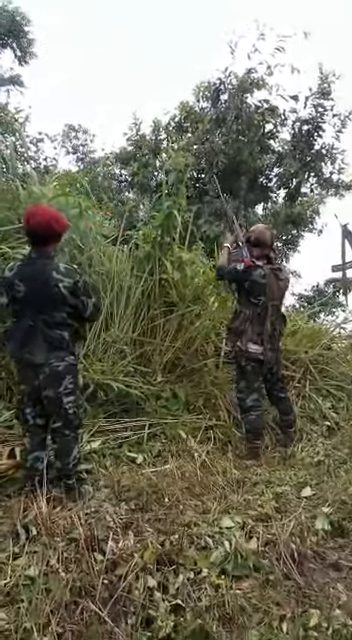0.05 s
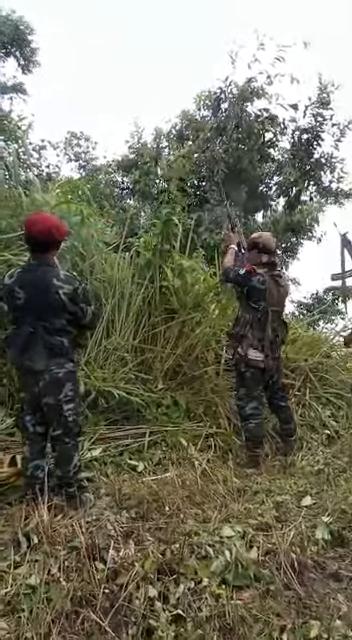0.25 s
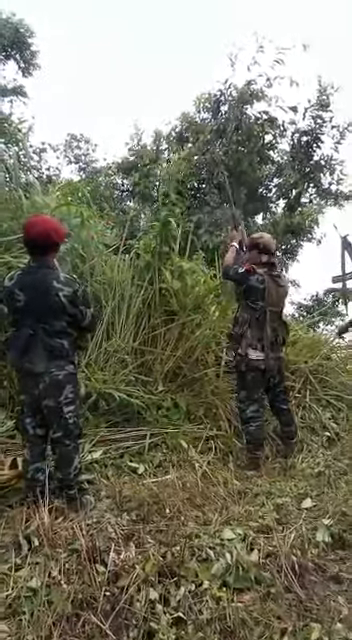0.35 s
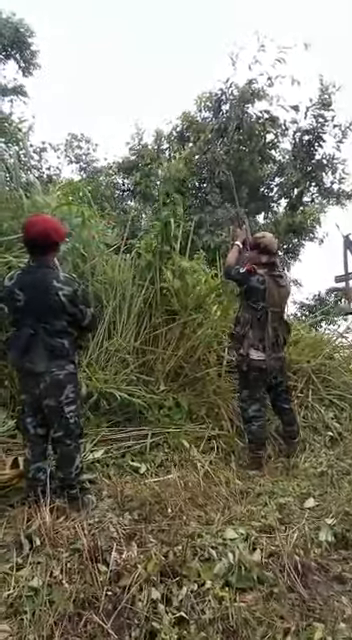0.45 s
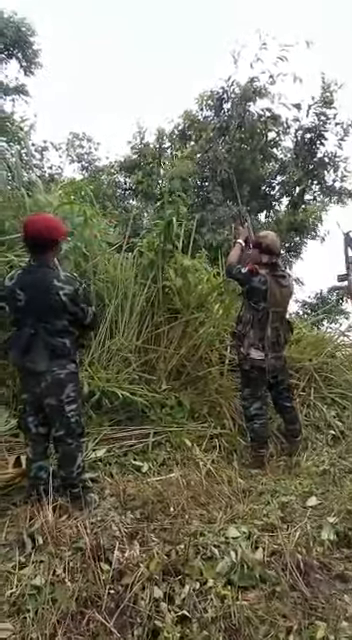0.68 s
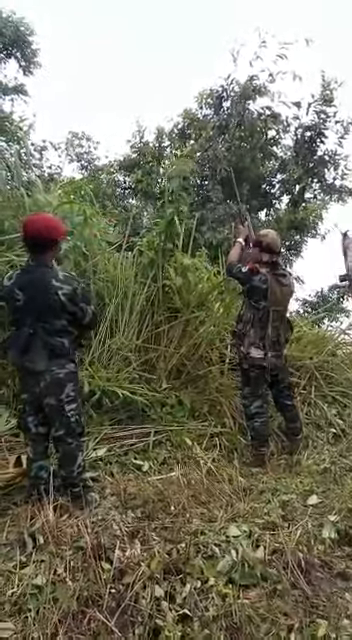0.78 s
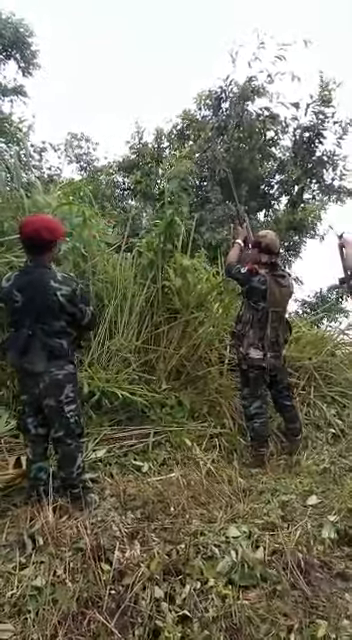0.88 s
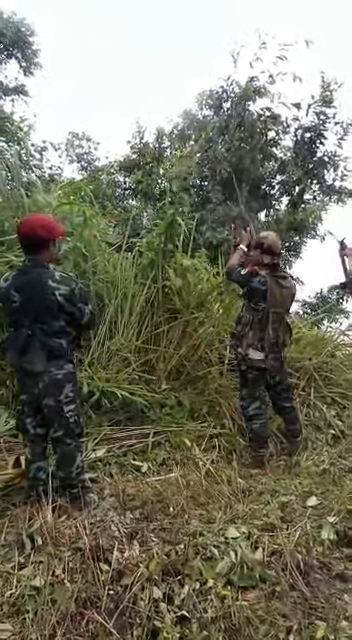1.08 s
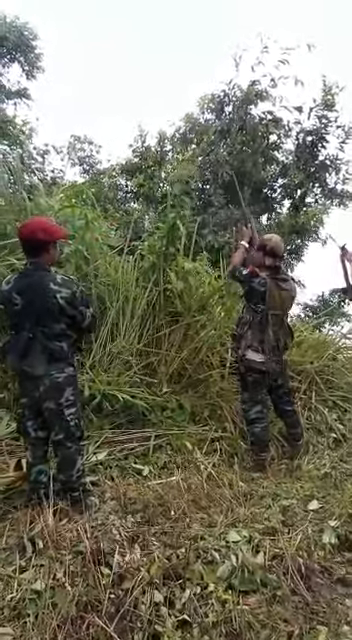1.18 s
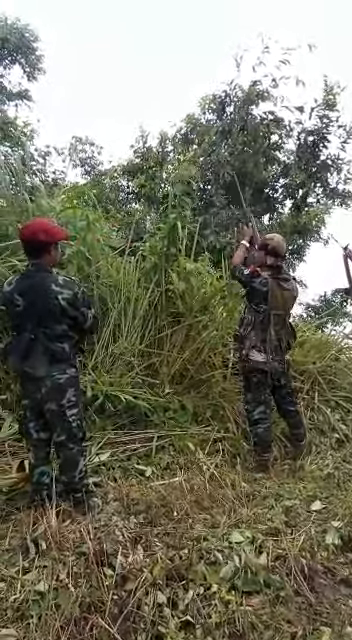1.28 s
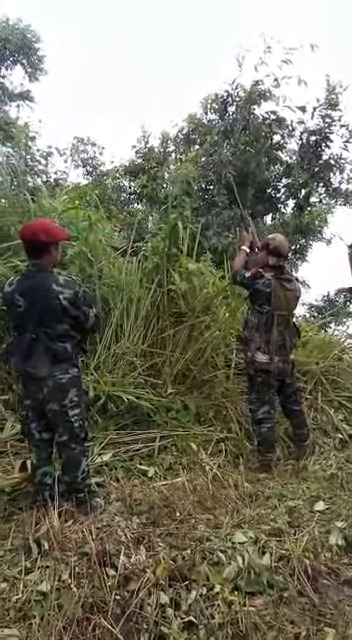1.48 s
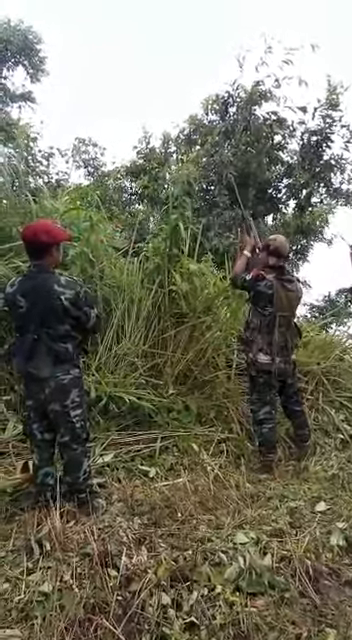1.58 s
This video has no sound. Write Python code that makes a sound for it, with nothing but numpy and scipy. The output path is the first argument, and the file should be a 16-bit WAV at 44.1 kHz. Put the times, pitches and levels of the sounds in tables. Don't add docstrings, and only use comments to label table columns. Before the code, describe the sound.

Two rifle shots less than a second apart in a brushy clearing, each preceded by tiny metallic ticks and followed by echoes from bushes, trees and a far slope; close phone microphone overloads and clips.

```python
import sys
import numpy as np
from scipy import signal
from scipy.io import wavfile
from scipy.ndimage import uniform_filter1d

SR = 44100
rng = np.random.default_rng(int(sys.argv[2]) if len(sys.argv) > 2 else 0)


def master_out(mix):
    frames = np.transpose(np.atleast_2d(mix))
    ceiling = np.clip(frames, -1, 1)
    pcm = np.round(ceiling * 32767).astype(np.int16)
    wavfile.write(sys.argv[1], SR, pcm)


def decibels_to_gain(level_db):
    exponent = np.asarray(level_db, float) / 20
    return 10 ** exponent


N = 72765


def evened(x):
    return x / np.sqrt(np.mean(x ** 2) + 1e-20)


def read(points, hz):
    f, value = np.transpose(points)
    return np.interp(np.log(hz + 1), np.log(f + 1), value)


def add(mix, s, sound):
    part = mix[round(s * SR):][:len(sound)]
    part += sound[:len(part)]


def shaped(x, field_db):
    hz, t, z = signal.stft(x, SR, nperseg=512, noverlap=384)
    z = z * decibels_to_gain(field_db(hz[:, None], t[None]))
    return signal.istft(z, SR, nperseg=512, noverlap=384)[1][:len(x)]


def coloured(x, points):
    return evened(shaped(x, lambda hz, t: read(points, hz)))


def filtered(x, order, hz, kind):
    return signal.sosfilt(signal.butter(order, hz, kind, fs=SR, output="sos"), x)


def fading(t, t60_s):
    return decibels_to_gain(-60 * t / t60_s)


def ring(t, modes):
    return sum(decibels_to_gain(db) * fading(t, t60) * np.sin(2 * np.pi * hz * t) for hz, db, t60 in modes)


# pitch_hz, level_db (per Hz)
STILL = [(30, 4), (150, -2), (400, 0.5), (1500, -4.5), (3000, -6), (7000, -14), (12500, -9), (15000, -15)]
STILL_DB = -69
PUFF_HZ, PUFF_WIDTH_HZ, PUFF_DB, PUFF_END_S, PUFF_FADE_S = 134, 25, -61, .088, .008
PUFF_SKIRT_DB, PUFF_SKIRT_HZ = -11, 420
PUFF_SWELL_DB, PUFF_TOP_S, PUFF_SWELL_S = 9, .067, 0.016


def still_air():
    t = np.arange(N) / SR
    floor = coloured(rng.standard_normal(N), STILL)
    wander = rng.standard_normal((N, 2)) @ [1, 1j]
    drift = signal.lfilter(*signal.butter(2, PUFF_WIDTH_HZ / 2, fs=SR), wander)
    moan = np.sin(2 * np.pi * PUFF_HZ * t + np.angle(drift))
    skirt = filtered(rng.standard_normal(N), 3, (PUFF_HZ, PUFF_SKIRT_HZ), "band")
    puff = evened(moan) + decibels_to_gain(PUFF_SKIRT_DB) * evened(skirt)
    puff *= decibels_to_gain(PUFF_SWELL_DB * np.exp(-((t - PUFF_TOP_S) / PUFF_SWELL_S) ** 2))
    puff /= 1 + np.exp(np.minimum((t - PUFF_END_S) / PUFF_FADE_S, 50))
    return decibels_to_gain(STILL_DB) * floor + decibels_to_gain(PUFF_DB) * puff


# pitch_hz, level_db, t60_s
SPRING = [(1790, 0, .04), (1870, -8, .08), (2780, -3, .04), (2600, -12, .07)]
# pitch_hz, width_hz, level_db
STEEL = [(1900, 1200, 0), (3300, 900, -2), (4400, 1200, -2), (6000, 1500, -13)]
RATTLE, SPRING_RISE_S, STEEL_T60_S, TICK_RISE_S = .5, .002, 0.016, .0006


def steel_db(hz, t):
    return 20 * np.log10(sum(decibels_to_gain(db) / (1 + (2 * (hz - f) / width) ** 2) for f, width, db in STEEL))


def tick(db, colour):
    t = np.arange(4000) / SR
    rattle = 1 + RATTLE * evened(uniform_filter1d(rng.standard_normal(len(t)), size=60))
    spring = ring(t, SPRING) * rattle * np.minimum(t / SPRING_RISE_S, 1)
    steel = evened(shaped(rng.standard_normal(len(t)), steel_db)) * fading(t, STEEL_T60_S)
    both = (1 - colour) * spring + colour * steel
    return decibels_to_gain(db) * np.minimum(t / TICK_RISE_S, 1) * both / 2


# pitch_hz, level_db
LEAD_IN_TONES = [(6800, -18), (14600, -2)]
LEAD_IN_RISE_S, LEAD_IN_FALL_S = .0008, 0.0065


def lead_in(lead, db):
    t = np.arange(0, lead, 1 / SR)
    tones = sum(decibels_to_gain(d) * np.sin(2 * np.pi * hz * t) for hz, d in LEAD_IN_TONES)
    return decibels_to_gain(db) * np.minimum(t / LEAD_IN_RISE_S, 1) * np.exp(-t / LEAD_IN_FALL_S) * (1 + tones)


BLAST_S, BLAST_DB = 0.00022, 28


def blast(t):
    return -decibels_to_gain(BLAST_DB) * (1 - t / BLAST_S) * np.exp(-t / BLAST_S)


CRACK_DB, CRACK_HZ, CRACK_RISE_S, CRACK_T60_S = 16.5, 7050, 0.0005, 0.013


def crack(t):
    hiss = evened(filtered(rng.standard_normal(N), 1, CRACK_HZ, "high"))
    return decibels_to_gain(CRACK_DB) * fading(t, CRACK_T60_S) * np.minimum(t / CRACK_RISE_S, 1) ** 2 * hiss


# pitch_hz, level_db, t60_s
BOOM = [(298.3, 1.5, 0.091), (583.2, 14.5, 0.033), (670, 1.5, 0.048), (882, -8, 0.19)]


def boom(t):
    return -ring(t, BOOM)


LEAVES_PER_S, LEAF_SPREAD_DB = 6000, 1
SAME_PATH = 0.92


def leaves():
    size = decibels_to_gain(LEAF_SPREAD_DB * np.minimum(rng.exponential(1, N), 4)) * rng.choice([-1., 1.], N)
    return evened(size * (rng.random(N) < LEAVES_PER_S / SR))


def mostly_same(shared):
    return np.sqrt(SAME_PATH) * shared + np.sqrt(1 - SAME_PATH) * leaves()


# pitch_hz, level_db (per Hz)
BUSH = [(30, -37.5), (75, -16.5), (130, -2), (320, 6), (600, -1), (1500, -2.5), (3000, -6.5), (7000, -16.5)]
BUSH_DB, BUSH_T60_S, BUSH_TREBLE_T60_S, BUSH_SPLIT_HZ, BUSH_HOLD_S = 3, 0.19, 0.12, 1690, 0.0067


def bush_returns(t, shared):
    bush = coloured(mostly_same(shared), BUSH)
    low = signal.sosfiltfilt(signal.butter(2, BUSH_SPLIT_HZ, fs=SR, output="sos"), bush)
    after = np.maximum(t - BUSH_HOLD_S, 0)
    return decibels_to_gain(BUSH_DB) * (low * fading(after, BUSH_T60_S) + (bush - low) * fading(after, BUSH_TREBLE_T60_S))


# pitch_hz, level_db (per Hz)
TREES = [(30, -47.5), (70, 1), (150, -9), (350, 0.5), (700, -3.5), (1500, -3), (3000, -7.5), (7000, -16.5)]
# (extra, per s of travel)
AIR = [(100, 2), (500, -7), (1500, 22), (4000, 30.5), (9000, 58), (15000, 129)]
# after_shot_s, level_db
WOODS = [(.03, -27.5), (.1, -20.5), (.2, -19), (.29, -21), (.42, -27.5), (.55, -30), (.64, -38), (.86, -47)]
AIR_FROM_S, PATCHY_DB, LAST_FALL_DB_PER_S = 0.072, 1.5, 42


def trees_db(hz, t):
    patches = rng.standard_normal((hz.size, t.size))
    patches = uniform_filter1d(patches, size=6, axis=0)
    patches = evened(uniform_filter1d(patches, size=8, axis=1))
    return read(TREES, hz) + PATCHY_DB * patches - read(AIR, hz) * (t - AIR_FROM_S)


def tree_returns(t, shared):
    trees = shaped(mostly_same(shared), trees_db)
    trees /= np.sqrt(np.mean(trees[round(.1 * SR):round(.22 * SR)] ** 2))
    when, db = np.transpose(WOODS)
    return trees * decibels_to_gain(np.interp(t, when, db) - LAST_FALL_DB_PER_S * np.maximum(t - when[-1], 0))


# after_shot_s, level_db, pitch_hz
TRUNKS = [(0.052, -14, 505), (.065, -5, 690), (.135, -9.5, 760), (.161, -9.5, 610), (.212, -30, 454),
          (0.661, -32.5, 387), (0.084, -12.5, 583), (.205, -10.5, 910), (.228, -10, 533), (.28, -15, 680),
          (.35, -16, 457), (.49, -20, 410)]
TRUNK_CYCLES = 0.8


def trunk(db, hz):
    u = np.arange(0, 4 * TRUNK_CYCLES, hz / SR)
    return decibels_to_gain(db) * np.sin(2 * np.pi * u) * (u / TRUNK_CYCLES) * np.exp(1 - 2 * u / TRUNK_CYCLES) * 2


def late_return(t, noise, start_s, db, rise_s, hold_s, t60_s):
    rise = np.clip((t - start_s) / rise_s, 0, 1)
    return noise * rise * decibels_to_gain(db) * fading(np.maximum(t - start_s - hold_s, 0), t60_s)


# pitch_hz, level_db (per Hz)
ROW = [(150, -18), (300, -5), (600, 6.5), (1000, -1.5), (2200, -7.5), (4000, -27.5)]


def row_return(t, shared):
    noise = coloured(shared[::-1], ROW)
    return late_return(t, noise, start_s=.202, db=-24.5, rise_s=0.005, hold_s=0.078, t60_s=0.35)


# pitch_hz, level_db (per Hz)
SLOPE = [(100, -36), (200, -9), (350, 12), (800, -2.5), (1200, -3.5), (2000, -2), (3000, -12),
         (7000, -33.5)]


def slope_return(t):
    noise = coloured(leaves(), SLOPE)
    return late_return(t, noise, start_s=0.613, db=-35.5, rise_s=0.051, hold_s=0.15, t60_s=0.64)


def shot(shared_bush, shared_trees):
    t = np.arange(N) / SR
    out = blast(t) + crack(t) + boom(t)
    out += bush_returns(t, shared_bush) + tree_returns(t, shared_trees)
    for s, db, hz in TRUNKS:
        add(out, s, trunk(db, hz))
    return out + row_return(t, shared_trees) + slope_return(t)


# start_s, level_db, colour (0 spring to 1 steel)
TICKS = [
    (0.163, -35, 0),
    (0.172, -45, 0),
    (0.196, -38, 0.77),
    (0.2059, -26, 0.91),
    (1.0142, -28, 0.58),
    (1.039, -27.5, 0.92),
]
# start_s, level_db
SHOTS = [
    (.2132, 0),
    (1.0782, 0),
]
# lead_s, level_db
LEAD_INS = [
    (.0027, -18),
    (.0078, -20),
]


def scene():
    mix = still_air()
    for s, db, colour in TICKS:
        add(mix, s, tick(db, colour))
    for (s, _), (lead, db) in zip(SHOTS, LEAD_INS):
        add(mix, s - lead, lead_in(lead, db))
    shared = leaves(), leaves()
    for s, db in SHOTS:
        add(mix, s, decibels_to_gain(db) * shot(*shared))
    return mix[None]


def top_cut(x):
    return signal.sosfilt(signal.butter(12, 15850, fs=SR, output="sos"), x)


# pitch_hz, level_db
MIC = [(20, -2.5), (6800, 2.5), (7800, -13.5), (10000, -17), (13000, -27.5), (14300, -22.5), (15600, -12.5),
       (16200, -49.5)]
OVERLOAD, LOW_CUT_HZ, EDGE_HZ = 1.08, 104, 15600
HISS_DB, HISS_HZ = -84, 13800


def record(dry):
    gain_ln = np.log(decibels_to_gain(read(MIC, abs(np.fft.fftfreq(2048, 1 / SR)))))
    port = np.fft.ifft(np.exp(np.conj(signal.hilbert(gain_ln)))).real[:1024]
    x = signal.oaconvolve(np.clip(dry, -OVERLOAD, OVERLOAD), port[None])[:, :N]
    x = filtered(x, 2, LOW_CUT_HZ, "high")
    x += decibels_to_gain(HISS_DB) * evened(filtered(rng.standard_normal(N), 3, HISS_HZ, "high"))
    x = signal.sosfiltfilt(signal.butter(12, EDGE_HZ, fs=SR, output="sos"), np.clip(x, -1, 1))
    return top_cut(np.clip(x, -1, 1))


dry = scene()
out = record(dry)
master_out(out)
```